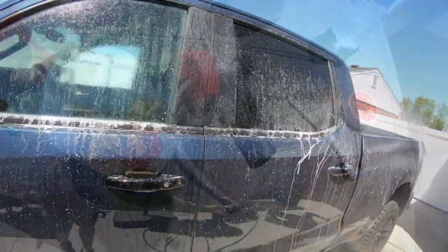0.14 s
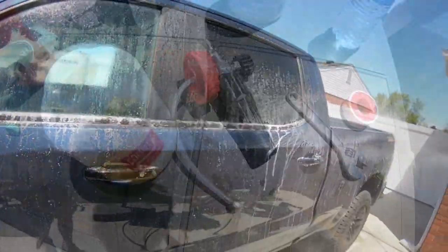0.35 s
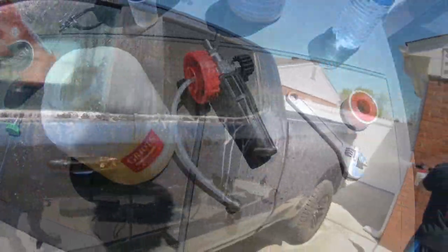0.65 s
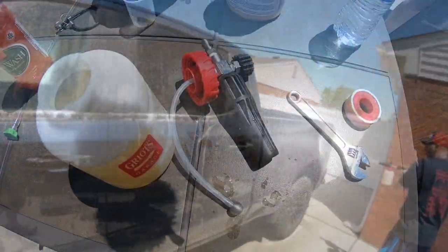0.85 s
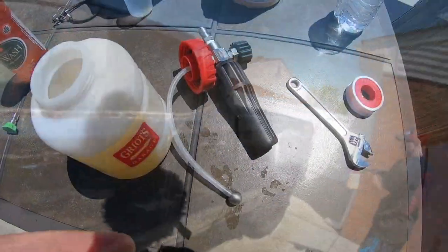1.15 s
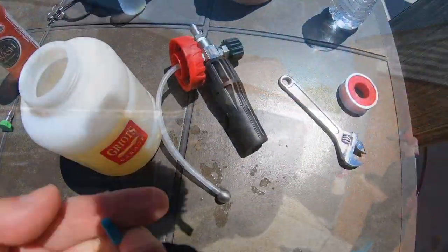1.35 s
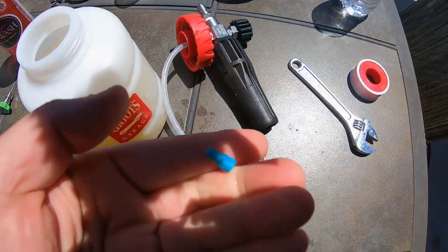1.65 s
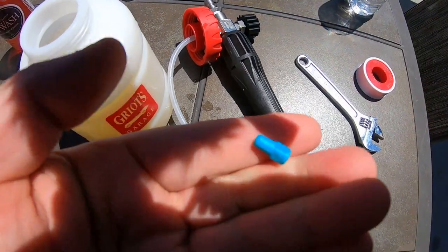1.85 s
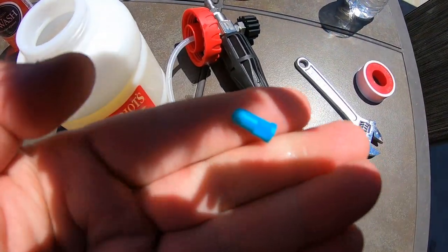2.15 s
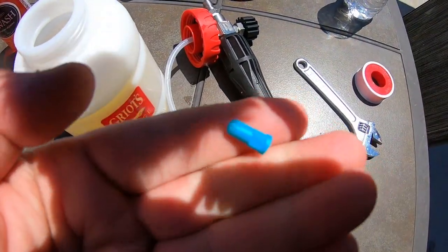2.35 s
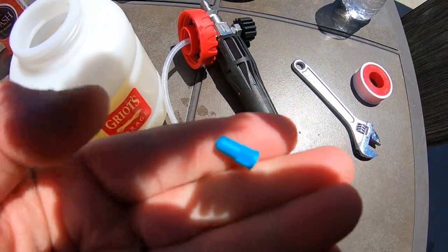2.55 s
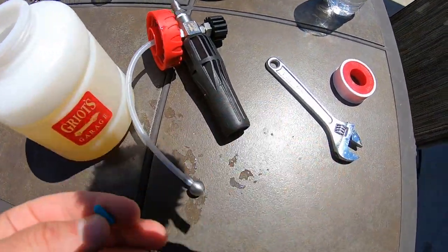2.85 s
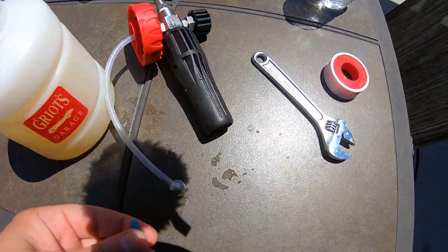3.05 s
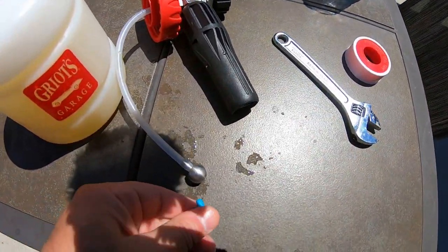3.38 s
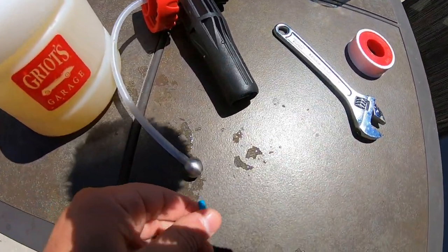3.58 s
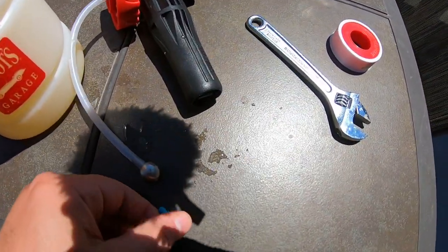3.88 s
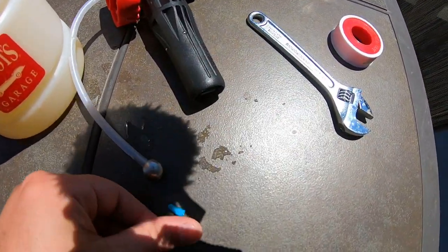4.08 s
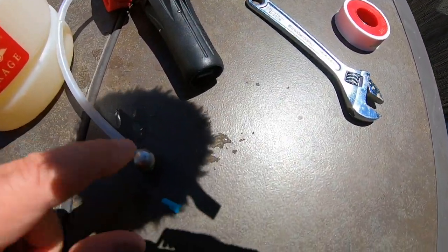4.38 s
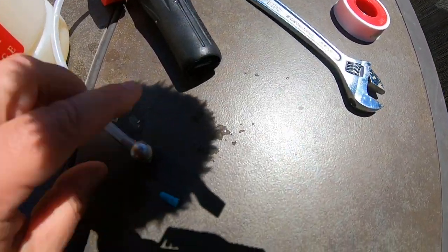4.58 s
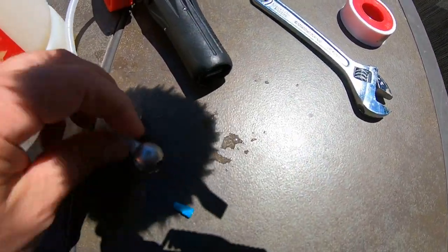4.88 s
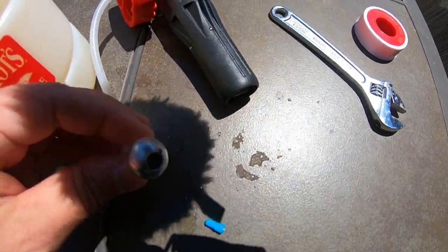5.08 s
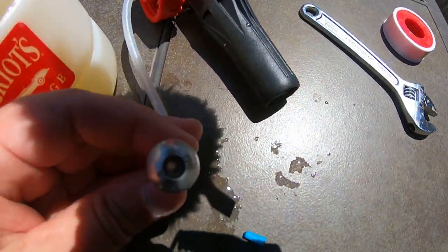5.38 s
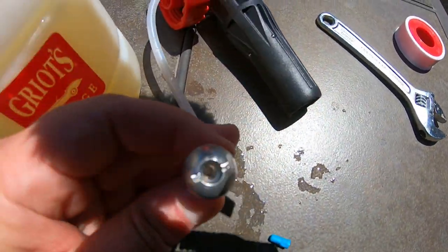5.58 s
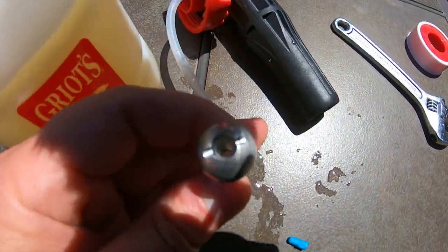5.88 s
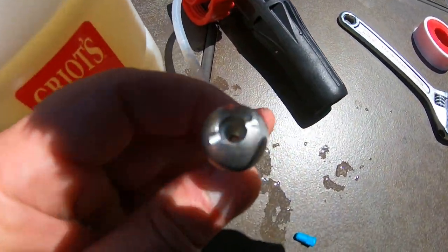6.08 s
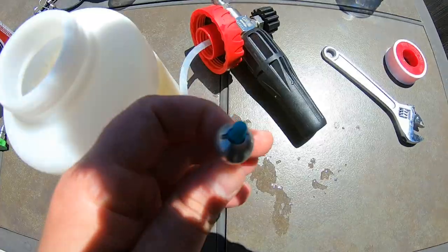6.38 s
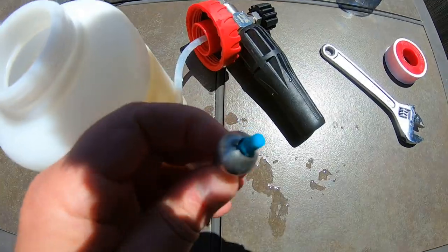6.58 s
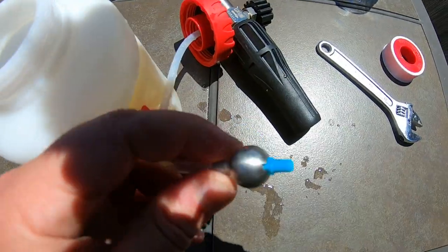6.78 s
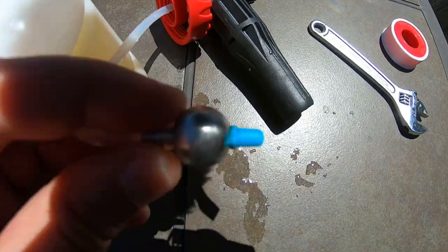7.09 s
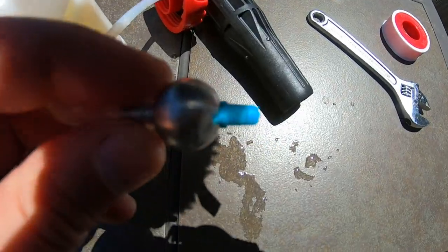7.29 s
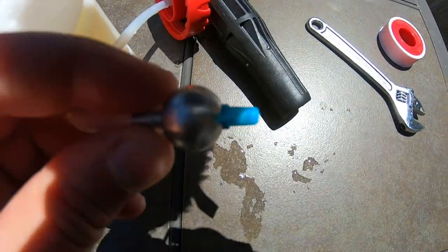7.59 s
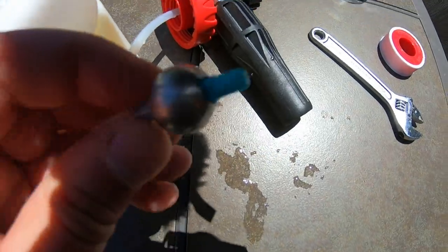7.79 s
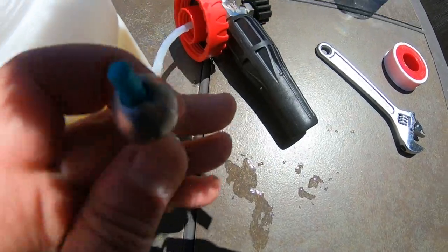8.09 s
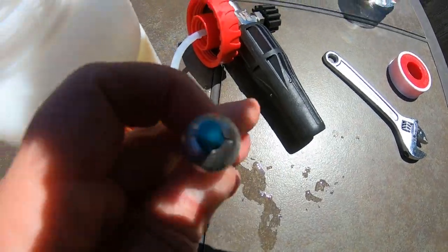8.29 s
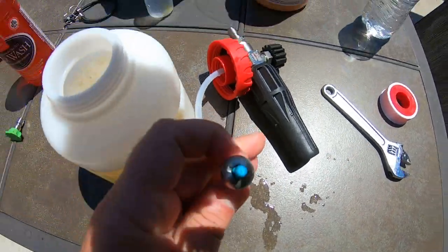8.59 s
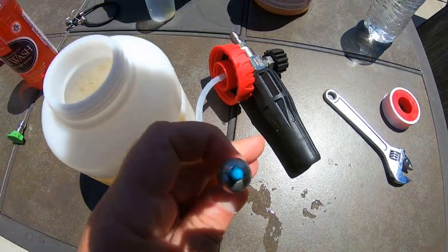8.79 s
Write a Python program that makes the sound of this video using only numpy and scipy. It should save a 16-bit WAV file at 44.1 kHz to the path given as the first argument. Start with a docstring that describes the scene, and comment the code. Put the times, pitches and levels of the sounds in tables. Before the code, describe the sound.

Foam spray hisses over a chugging pressure washer and fades into the engine's steady, clattering drone, broken by a short silence.

```python
"""Pressure washer on a driveway

In stereo, a single-cylinder engine thuds under load while the foam jet hisses and spits in time with
it, off to the right. This fades into the engine running free, heard from a work table: muffler boom,
clatter, ringing casing and fan air, with faint mains hum and wind on the microphone. A wide hiss
swells, then the sound drops out for half a second and returns without it."""
import sys
import numpy as np
from scipy import signal
from scipy.fft import rfft, irfft, next_fast_len
from scipy.io import wavfile
from scipy.ndimage import uniform_filter1d

SR = 44100
rng = np.random.default_rng(int(sys.argv[2]) if len(sys.argv) > 2 else 0)


def materialize(psi):
    """Save the field psi as 16-bit PCM at rate SR to the path in sys.argv[1].

    A 1-D psi becomes a single channel; in a 2-D psi each row is a channel.
    """
    bounded = np.clip(np.atleast_2d(psi).T, -1, 1)
    quanta = np.round(bounded * 32767).astype(np.int16)
    wavfile.write(sys.argv[1], SR, quanta)


N = 394254

# exhaust tone, under load and running free: multiple of the firing rate, relative level/dB
LOADED_ORDERS = [(1, -9.5), (2, -12.5), (3, 2), (4, 0.5), (5, -6.5), (6, -6.5), (7, -4.5), (8, -22),
                 (9, -12), (10, -12), (11, -24), (12, -35), (13, -14), (14, -39.5), (15, -26.5),
                 (16, -24.5), (17, -17), (18, -42.5), (19, -22), (20, -19), (21, -27.5), (22, -20.5),
                 (23, -19.5), (24, -15), (25, -19), (26, -23)]
FREE_ORDERS = [(1, -22), (2, -17), (3, -10.5), (4, -21.5), (5, -9), (6, 2.5), (7, -8.5), (8, -16),
               (9, -12.5), (10, -13), (11, -19), (12, -11), (13, -20), (14, -22), (15, -23), (16, -23.5),
               (17, -23), (18, -42.5)]
# weak burns, after which the crank falls behind: t/s, greatest delay/s
WEAK_BURNS = [(.82, .0009), (1.3, .0013), (1.76, .0009), (2.25, .0007), (3.4, .0004), (3.83, .0007),
              (4.16, .0011), (4.47, .0013), (5.5, .0006), (5.81, .0007), (6.06, .0007), (6.76, .0009),
              (7.15, .0003), (7.99, .0008), (8.34, .0005)]
# noise spectra: f/Hz, relative level/dB
LOADED_CLATTER_SPECTRUM = [(250, -23.5), (400, -15), (550, -4.5), (700, 0), (950, 0), (1200, -4.5),
                           (1500, -3.5), (1900, -4), (2300, -5.5), (2800, -10), (3500, -8.5), (5000, -20.5),
                           (8000, -46.5)]
JET_SPECTRUM = [(2000, -26), (3400, -5.5), (4500, -3.5), (5400, 0.5), (6400, -3), (7500, 0.5), (8500, -9.5),
                (10000, -11), (11500, -24.5), (13500, -30), (15500, -43)]
SPIT_SPECTRUM = [(500, -23.5), (1000, -2.5), (3000, -13.5), (5500, 7), (7500, 6), (10500, -4.5),
                 (11800, -16.5), (14000, -16.5), (16000, -30)]
FREE_CLATTER_SPECTRUM = [(150, 7), (380, 7.5), (560, 9.5), (720, 5.5), (930, 3), (1100, -3), (1400, -2),
                         (1900, -3.5), (2300, -4.5), (2800, -9.5), (3600, -14.5), (5000, -27)]
FAN_SPECTRUM = [(1800, -26.5), (2900, -0.5), (3500, 0.5), (4300, 1.5), (5200, -3.5), (6200, -5.5),
                (7000, -18.5), (8200, -33)]
SIZZLE_SPECTRUM = [(5500, -10.5), (7200, 0.5), (8200, -3.5), (9100, 5.5), (9700, -9), (10400, 4),
                   (11200, -7.5), (12500, -11.5), (14000, -19), (15500, -30)]
WIND_SPECTRUM = [(15, -2.5), (35, -10), (70, 4.5), (110, 6.5), (200, -10.5), (350, -0.5), (600, -24.5)]
HISS_SPECTRUM = [(200, -7.5), (600, 5), (1500, 7.5), (3000, -0.5), (4500, -2.5), (6300, 1), (8000, -2.5),
                 (10500, -6.5), (12500, -14), (15000, -24.5)]
# steady resonances of the casing: f/Hz, width/Hz, relative level/dB
CASING_MODES = [(624, 24, -47), (866, 24, -52), (1045, 12, -53), (1364, 10, -53), (2096, 13, -53.5),
                (2780, 19, -55.5), (4224, 54, -55)]
# resonances that stand out as the microphone moves: from t/s, to t/s, f/Hz, width/Hz, relative level/dB
PASSING_RINGS = [(1.4, 2.6, 1525, 20, -47), (1.4, 2.93, 2480, 130, -45), (1.3, 3.2, 3480, 160, -45),
                 (1.5, 4.9, 930, 50, -46), (2.8, 4.5, 1480, 30, -43), (3.1, 4.2, 2910, 200, -45),
                 (3.1, 5.1, 2325, 60, -43), (4.5, 5.13, 610, 13, -38), (4.9, 6.4, 2170, 70, -45.5),
                 (5.0, 9.5, 1350, 200, -48), (6.7, 8.42, 2350, 85, -42), (7.65, 8.3, 2340, 16, -44),
                 (8.38, 9.5, 1780, 70, -41.5), (8.5, 9.6, 3380, 90, -43.5)]
# treble at the work table: t/s, fan air level/dB, sizzle level/dB
FAN_LEVELS = [(1.45, -44.2, -60.5), (2.3, -46.3, -57.5), (3.3, -46.8, -63.5), (4.1, -45.3, -68),
              (4.8, -47, -63), (6.2, -43, -62), (7.2, -47.5, -68.5), (8.1, -46.2, -61), (8.6, -43.2, -55.5)]
# gusts on the microphone: t/s, width/s, level/dB, change in the exhaust's deepest bass/dB
GUSTS = [(2.73, .06, -35, -7), (3.32, .07, -33, -7), (3.45, .3, -41.5, -4), (7.85, .1, -41, 0)]

# under load, running free and after the pause: governed firing rate, and the time of one firing
LOADED_HZ, FREE_HZ, RESUMED_HZ = 27.887, 30.8447, 30.8729
LOADED_FIRING_S, FREE_FIRING_S, RESUMED_FIRING_S = .0038, 1.3433, 6.9165
GOVERNOR_S = .14  # from a weak burn to the greatest delay
THUD_DB, LOADED_CLATTER_DB, JET_DB = -18.8, -27.2, -32  # at the start of the spraying
BOOM_DB, FREE_CLATTER_DB, CASING_GAIN_DB, BASS_LIFT_DB = -14.4, -31.9, -4.0, 1.0
HISS_DB, BOOM_DUCK_DB = -36.5, -2.2  # at the top of the hiss's swell
HUM_HZ, HUM_DB, BREEZE_DB = 119.6, -39.5, -44
SPRAY_GONE_S, ENTRY_S, ENTRY_FADE_S, RING_FADE_S = 1.7, 1.26, .1, .25
HISS_FROM_S, PAUSE_S, RETURN_S, RETURN_FADE_S = 5.3, 6.3387, 6.838, .068
CUTOFF_HZ = 15700
TIME_S = np.arange(N) / SR


def loaded_engine(cycle):
    """Under load the exhaust thuds over a light breeze, and the clatter flares at each firing."""
    thud = exhaust(cycle, LOADED_ORDERS, LOADED_HZ, uneven_db=.9, jitter_s=.00015)
    thud = np.array([np.r_[0, 0, thud[:-2]], thud])  # reaches the left channel a little later
    breeze = from_db(-17) * coloured(stereo_noise(alike=.2), WIND_SPECTRUM)
    knocks = .95 * contacts(cycle, uneven=.3, play_s=.00003) + stereo_noise(alike=.55, right_db=12)
    flare = 1 + 1.1 * burst(cycle, centre=.035, width=.08)
    clatter = coloured(knocks * flare, LOADED_CLATTER_SPECTRUM)
    return from_db(THUD_DB) * (thud + breeze) + from_db(LOADED_CLATTER_DB) * clatter


def foam_jet(cycle):
    """Right of the microphone the jet hisses, and crackles just after each firing."""
    hiss = coloured(stereo_noise(alike=.15, right_db=8.5), JET_SPECTRUM)
    flare = burst(cycle, centre=.1, width=.076) * per_cycle(cycle, spread_db=3.0)
    grains = from_db(4.0 * rng.standard_normal(N))
    spit = coloured(stereo_noise(alike=.2, right_db=8.5) * flare * grains, SPIT_SPECTRUM)
    return from_db(JET_DB) * (hiss + spit)


def free_engine(sag_db):
    """The faster, unloaded engine from the work table; its clatter and fan air throb once a cycle."""
    before, after = crank_cycles(FREE_HZ, FREE_FIRING_S), crank_cycles(RESUMED_HZ, RESUMED_FIRING_S)
    mid_pause = int((PAUSE_S + RETURN_S) / 2 * SR)
    cycle = np.r_[before[:mid_pause], after[mid_pause:] + np.ceil(before[mid_pause] - after[mid_pause])]
    boom = muffler_boom(cycle, sag_db)
    throb = 1 + .22 * burst(cycle, centre=.29, width=.26)
    knocks = throb * (contacts(cycle, uneven=.41, play_s=.00003) + 1.02 * rng.standard_normal(N))
    clatter = from_db(FREE_CLATTER_DB) * coloured(knocks, FREE_CLATTER_SPECTRUM)
    return boom + clatter + casing(knocks) + fan_air(cycle, throb)


def crank_cycles(rate_hz, firing_s):
    """Cycles gone by, whole at each firing; a weak burn delays the crank until the governor catches up."""
    delay_s = np.zeros(N)
    for burn_s, greatest_s in WEAK_BURNS:
        age = np.maximum(TIME_S - burn_s, 0) / GOVERNOR_S
        delay_s += greatest_s * age * np.exp(1 - age)
    return (TIME_S - delay_s - firing_s) * rate_hz


def firings(cycle, uneven_db, jitter_s):
    """One click a cycle; each burn has its own strength and comes a hair early or late."""
    at = np.flatnonzero(np.diff(np.floor(cycle)) > 0)
    strength, late = rng.standard_normal((len(at), 2)).T
    at = np.clip(at + np.round(late * jitter_s * SR).astype(int), 0, N - 1)
    return np.bincount(at, from_db(uneven_db * strength), N)


def exhaust(cycle, orders, firing_hz, uneven_db, jitter_s, size=8192):
    """Every firing rings the muffler, which dies away within about one cycle."""
    order, db = np.transpose(orders)
    multiple = np.fft.rfftfreq(size, 1 / SR) / firing_hz
    shape_db = np.interp(multiple, np.r_[0, order, order[-1] * 2, order[-1] * 8],
                         np.r_[-40, db, -80, -130])
    # folding the cepstrum gives the minimum-phase ringing of that spectrum
    cepstrum = irfft(np.log(from_db(shape_db)))
    cepstrum[1:size // 2] *= 2
    cepstrum[size // 2:] = 0
    ringing = irfft(np.exp(rfft(cepstrum)))
    return rms_one(signal.oaconvolve(firings(cycle, uneven_db, jitter_s), ringing)[:N])


def muffler_boom(cycle, sag_db):
    """The free-running exhaust: its bass sags in gusts, and it weakens as the wide hiss swells."""
    boom = exhaust(cycle, FREE_ORDERS, FREE_HZ, uneven_db=.22, jitter_s=.00006)
    bass, edge = below(boom, edge_hz=110), boom - below(boom, edge_hz=380)
    bass_gain = from_db(BASS_LIFT_DB + sag_db)
    edge_gain = from_db(2.4) * per_cycle(cycle, spread_db=1.0)  # a firing's edge varies more than its body
    boom = boom + (bass_gain - 1) * bass + (edge_gain - 1) * edge
    return from_db(BOOM_DB + BOOM_DUCK_DB * hiss_swell()) * muffler_chamber(boom, hz=500, width_hz=150)


def muffler_chamber(x, hz, width_hz):
    """A chamber holds back the partials near its resonance for a few milliseconds (an all-pass)."""
    poles = pole_pair(hz, width_hz)
    return signal.lfilter(poles[::-1], poles, x)


def contacts(cycle, uneven, play_s, count=48):
    """Valves, gears and pump pistons knock at the same crank angles in every cycle."""
    whole = np.arange(np.floor(cycle[0]), cycle[-1] + 1)[:, None]
    angle, force = rng.random(count), rng.choice([-1, 1], count)
    at = np.interp(whole + angle, cycle, np.arange(N), -SR, 2 * N)
    at = np.round(at + play_s * SR * rng.standard_normal(at.shape)).astype(int)
    force = force * (1 + uneven * rng.standard_normal(at.shape))
    inside = (at >= 0) & (at < N)
    return rms_one(np.bincount(at[inside], force[inside], N))


def casing(knocks):
    """Knocks ring the casing; some resonances hold, others come and go as the microphone moves."""
    ringing = sum(from_db(db) * resonance(knocks, hz, width_hz) for hz, width_hz, db in CASING_MODES)
    for start_s, end_s, hz, width_hz, db in PASSING_RINGS:
        heard = np.clip(.5 + np.minimum(TIME_S - start_s, end_s - TIME_S) / RING_FADE_S, 0, 1)
        ringing = ringing + from_db(db) * heard * resonance(knocks, hz, width_hz)
    return from_db(CASING_GAIN_DB) * ringing


def fan_air(cycle, throb):
    """Air rushes from the cooling fan with a sizzle on top; both drift in level."""
    times_s, air_db, sizzle_db = np.transpose(FAN_LEVELS)
    rush = throb * (stereo_noise(alike=1.0) + .6 * contacts(cycle, uneven=.5, play_s=.00002))
    air = from_db(np.interp(TIME_S, times_s, air_db)) * coloured(rush, FAN_SPECTRUM)
    sizzle = from_db(np.interp(TIME_S, times_s, sizzle_db)) * coloured(rush, SIZZLE_SPECTRUM)
    return air + sizzle


def wide_hiss():
    """A swelling bright hiss, spread right across the stereo image."""
    return from_db(HISS_DB) * hiss_swell() * coloured(stereo_noise(alike=.05), HISS_SPECTRUM)


def hiss_swell():
    """Grows from 0 to 1 up to the pause, and is gone after it."""
    return ramp(HISS_FROM_S, PAUSE_S - HISS_FROM_S) * (TIME_S < PAUSE_S)


def mains_hum():
    """A steady hum that beats slowly against the free engine's fourth order."""
    return from_db(HUM_DB) * rms_one(np.sin(2 * np.pi * HUM_HZ * TIME_S))


def microphone_wind():
    """Gusts swell over a steady breeze: gives the rumble, and the dB by which the exhaust's bass sags."""
    gain, sag_db = from_db(BREEZE_DB), 0
    for peak_s, width_s, db, bass_db in GUSTS:
        swell = np.exp(-.5 * ((TIME_S - peak_s) / width_s) ** 2)
        gain = gain + from_db(db) * swell
        sag_db = sag_db + bass_db * swell
    return gain * coloured(stereo_noise(alike=1.0), WIND_SPECTRUM), sag_db


def burst(cycle, centre, width):
    """A bell-shaped swell once a cycle; centre and width are in cycles."""
    return np.exp(-.5 * (((cycle - centre + .5) % 1 - .5) / width) ** 2)


def per_cycle(cycle, spread_db):
    """A gain drawn afresh for each cycle, gliding over halfway between firings."""
    number = np.round(cycle - np.floor(cycle[0])).astype(int)
    gain = from_db(spread_db * rng.standard_normal(number[-1] + 1))[number]
    return uniform_filter1d(gain, size=256)


def stereo_noise(alike, right_db=0):
    """White noise, partly shared by both channels; the middle has rms 1."""
    pair = np.sqrt(alike) * rng.standard_normal(N) + np.sqrt(1 - alike) * rng.standard_normal((2, N))
    pair = pair * from_db([[-right_db / 2], [right_db / 2]])
    return pair / pair.mean(axis=0).std()


def coloured(x, spectrum):
    """Gives a signal a spectrum; rms 1."""
    size = next_fast_len(N)
    hz, db = np.transpose(spectrum)
    log_hz = np.log(np.fft.rfftfreq(size, 1 / SR) + 1)
    gain = from_db(np.interp(log_hz, np.log(hz), db, -120, -120))
    return rms_one(irfft(rfft(x, size) * gain, size)[..., :N])


def resonance(drive, hz, width_hz):
    """One narrow resonance; rms 1."""
    return rms_one(signal.lfilter([1, 0, -1], pole_pair(hz, width_hz), drive))


def pole_pair(hz, width_hz):
    """Feedback coefficients of a damped resonator."""
    radius = np.exp(-np.pi * width_hz / SR)
    return [1, -2 * radius * np.cos(2 * np.pi * hz / SR), radius * radius]


def below(x, edge_hz):
    """The part of a signal under a frequency, not delayed."""
    return signal.sosfiltfilt(signal.butter(3, edge_hz, fs=SR, output="sos"), x)


def ramp(start_s, length_s):
    """Rises evenly from 0 to 1, then holds."""
    return np.clip((TIME_S - start_s) / length_s, 0, 1)


def from_db(db):
    return 10 ** (np.asarray(db) / 20)


def rms_one(x):
    return x / np.sqrt(np.mean(x ** 2) + 1e-20)


def scene():
    """The spraying gives way to the free engine at the work table, which drops out and returns."""
    wind, sag_db = microphone_wind()
    cycle = crank_cycles(LOADED_HZ, LOADED_FIRING_S)
    fade = 1 - ramp(0, SPRAY_GONE_S)
    spraying = fade * loaded_engine(cycle) + fade ** .85 * foam_jet(cycle)  # the jet fades more slowly
    at_table = free_engine(sag_db) + wide_hiss() + mains_hum() + wind
    fader = ramp(ENTRY_S, ENTRY_FADE_S) * (TIME_S < PAUSE_S) + ramp(RETURN_S, RETURN_FADE_S)
    return spraying + fader * at_table


def record(dry):
    """A steep low-pass takes off the very top."""
    return signal.sosfilt(signal.cheby2(14, 70, CUTOFF_HZ, fs=SR, output="sos"), dry)


dry = scene()
out = record(dry)
materialize(out)
```